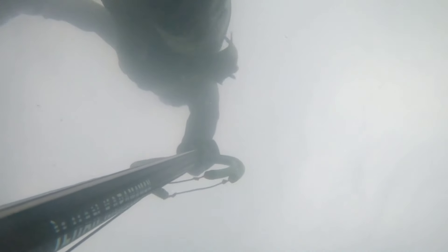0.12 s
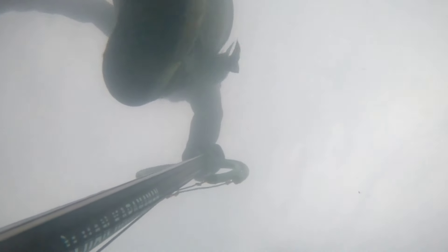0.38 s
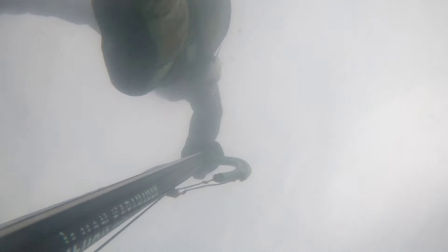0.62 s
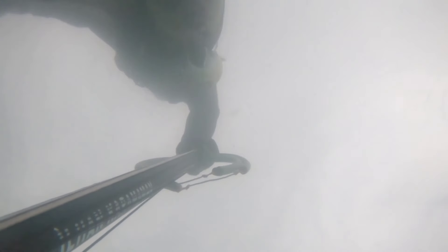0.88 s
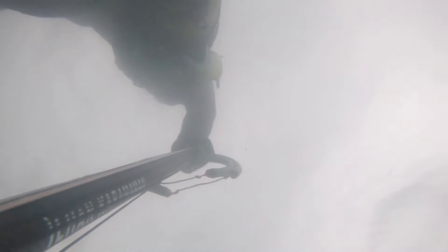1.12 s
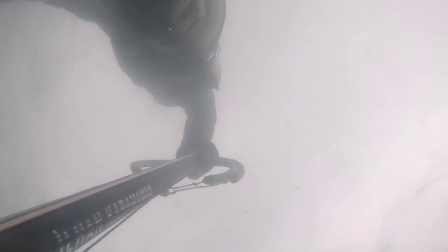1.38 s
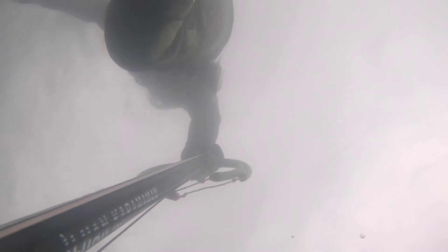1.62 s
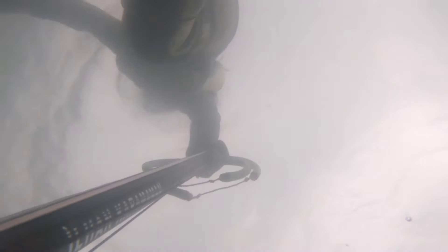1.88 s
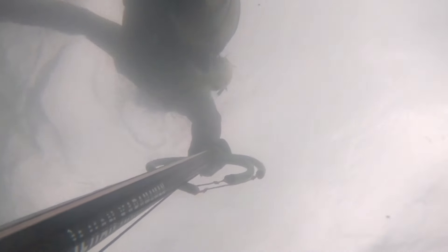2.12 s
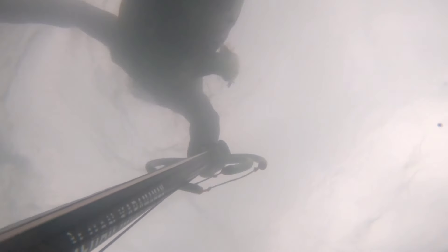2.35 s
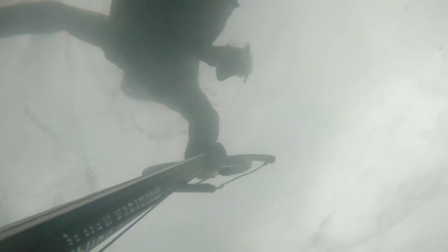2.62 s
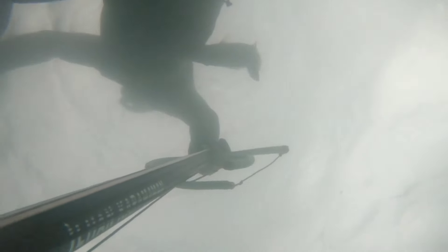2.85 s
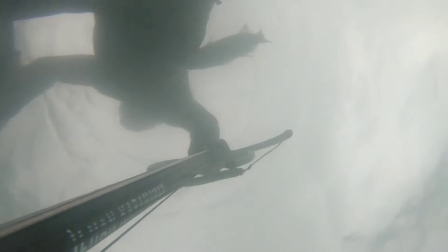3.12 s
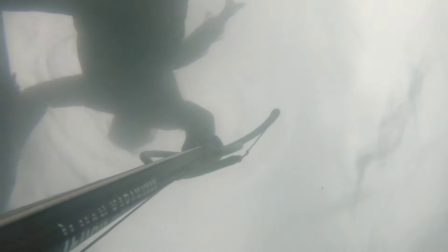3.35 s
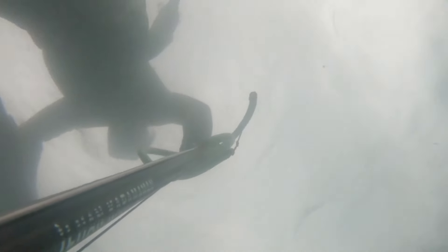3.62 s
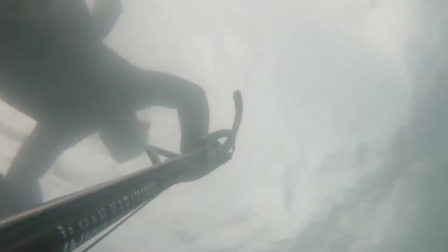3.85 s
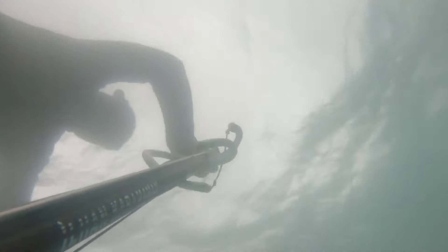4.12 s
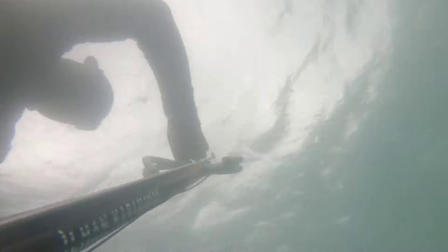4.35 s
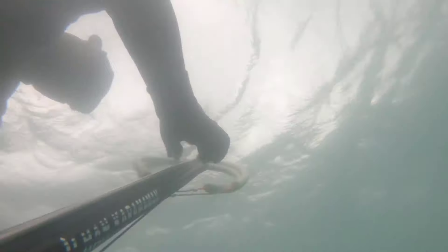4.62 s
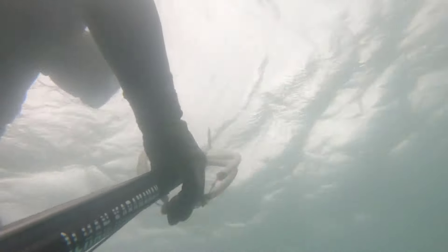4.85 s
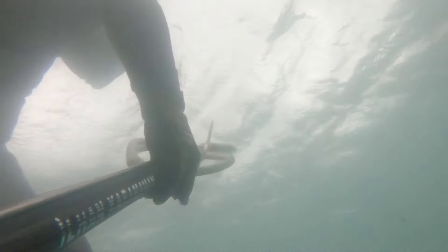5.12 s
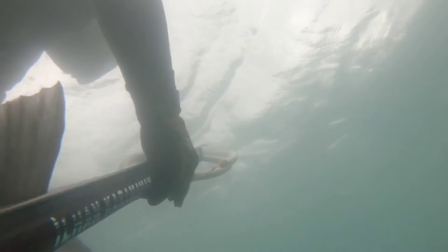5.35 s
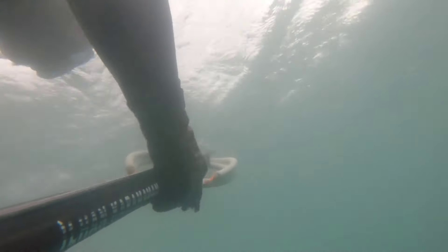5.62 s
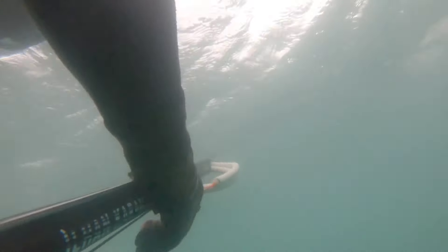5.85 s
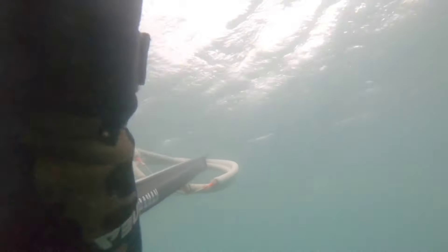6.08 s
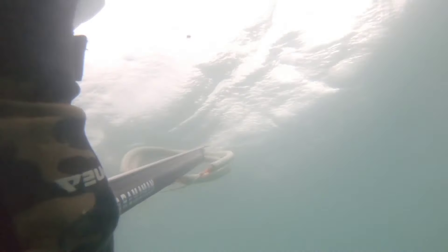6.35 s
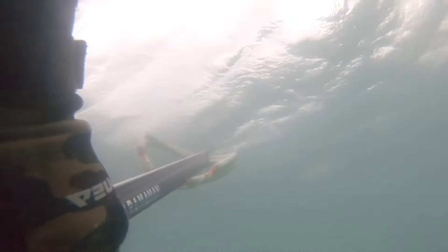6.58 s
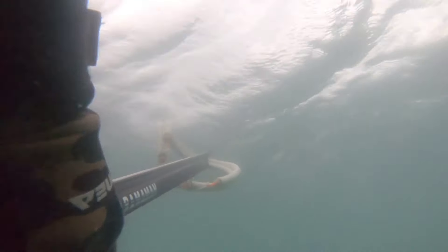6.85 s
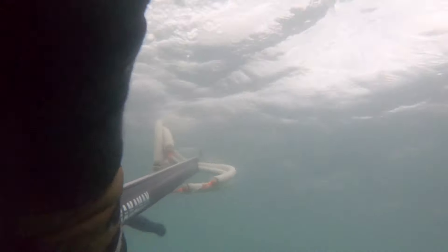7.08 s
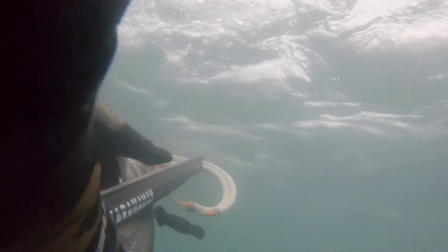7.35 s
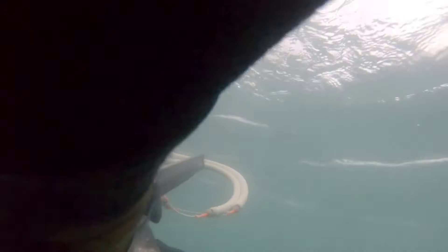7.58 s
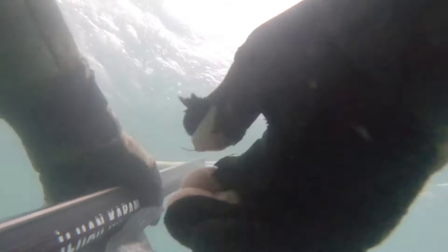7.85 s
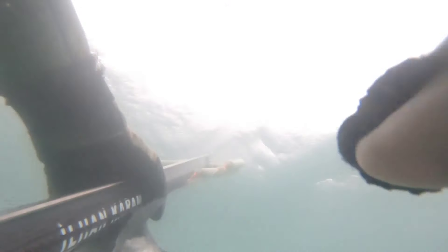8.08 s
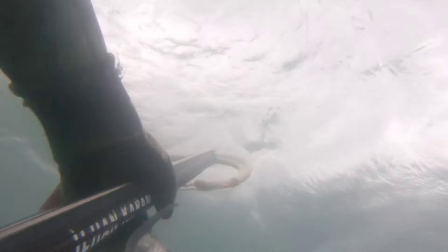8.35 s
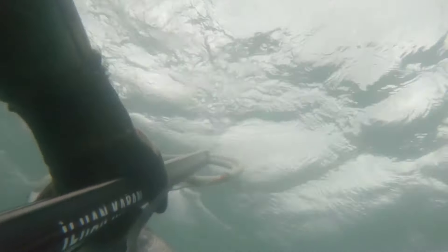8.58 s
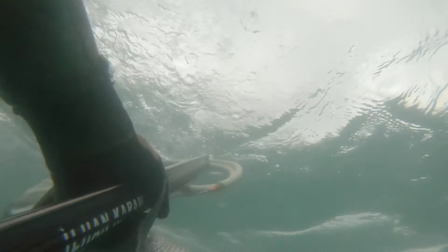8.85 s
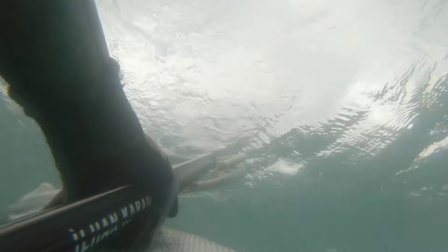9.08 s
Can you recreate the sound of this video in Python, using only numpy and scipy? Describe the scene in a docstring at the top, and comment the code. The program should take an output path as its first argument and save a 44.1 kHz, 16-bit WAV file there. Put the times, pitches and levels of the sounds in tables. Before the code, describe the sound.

Submerged, boxy low rumbling with soft bumps, a growing crackle of bubbles, one hard hollow clack, then dull bumping and rubbing of gear.

```python
"""Under water, a small sealed camera rides on a long pole held by a swimmer.
Shoves rock the pole and shudder its mount; water and gear graze the shell, exciting its damped modes.
Hands and gear knock and rub on it, a glove scrapes past the microphone ports, and bubbles tick and hiss.
The two ports are blended to mono except for a few seconds that open to stereo."""
import sys
import numpy as np
from scipy import signal
from scipy.fft import rfft, irfft
from scipy.io import wavfile
from scipy.ndimage import uniform_filter1d

SR = 44100
rng = np.random.default_rng(int(sys.argv[2]) if len(sys.argv) > 2 else 0)


def int16_out(signal):
    """Quantize to a 16-bit WAV file."""
    q = np.round(np.clip(np.atleast_2d(signal).T, -1, 1) * 32767)
    wavfile.write(sys.argv[1], SR, q.astype(np.int16))


def gain_from_decibels(decibels):
    """Convert decibel values to linear amplitude factors."""
    exponent = np.asarray(decibels, float) / 20
    return 10 ** exponent


N = 406160  # length in samples

# Slow bending modes of the pole and its mount.
# Each row: frequency in Hz, width in Hz, height in dB.
POLE_MODES = [(32.3, 7.5, 0), (64.6, 170, -1), (79, 12, -3.5)]
# Modes of the sealed housing, from dull to bright.
# Each row: frequency in Hz, width in Hz, height in dB.
HOUSING_MODES = [(198, 68, -7), (318, 148, 4), (432.6, 69, 2.5), (570, 32, 5.5), (837, 73, 3.5),
                 (1316, 181, 2), (1614, 130, -9.5), (2035, 23, -10.5), (2790, 110, -16), (3120, 170, -19),
                 (4340, 110, -29), (5150, 1900, -49), (6570, 510, -56.5)]
# Borders between the dull, middle, bright and brightest housing modes
WASH_HZ, BRIGHT_HZ, GRAZE_HZ = 750, 2300, 4000


def evened(x):
    """Scales to rms 1."""
    return x / np.sqrt(np.mean(x ** 2) + 1e-20)


def smoothed(x, s):
    """Runs a moving average of s seconds over the sound twice."""
    size = round(s * SR)
    return uniform_filter1d(uniform_filter1d(x, size), size)


def steadied(x, s):
    """Divides out slow level drift, so that the played curve sets the level."""
    return x / np.sqrt(abs(smoothed(x ** 2, s)) + 1e-20)


def curve(rows):
    """Draws each column of a table as a line over all samples; the first column is the time."""
    s, *columns = np.transpose(rows)
    return [np.interp(np.arange(N) / SR, s, column) for column in columns]


def add(mix, s, sound):
    """Mixes a sound in at time s."""
    part = mix[max(round(s * SR), 0):][:len(sound)]
    part += sound[:len(part)]


def ring(modes, size=8192, spread_db=0.):
    """Impulse response of damped modes that swell in through the soft shell; dB is each resonance's height."""
    t, out = np.arange(size) / SR, np.zeros(size)
    for hz, width, db in modes:
        chance = rng.standard_normal(2)  # scatters height and pitch
        fade = 2 * np.pi * width * t
        turns = hz * (1 + .004 * spread_db * chance[1]) * t
        height = gain_from_decibels(db + spread_db * chance[0])
        out += height * width * fade * np.exp(-fade) * np.sin(2 * np.pi * turns)
    return out


def part_of(lo_hz, hi_hz):
    """The housing modes within a range."""
    return [mode for mode in HOUSING_MODES if lo_hz <= mode[0] < hi_hz]


def grit(per_s, spread_db, lump_s, lump_db):
    """Random small impacts that come in lumps."""
    size = gain_from_decibels(spread_db * np.minimum(rng.exponential(1, N), 5))
    size = size * (rng.random(N) < per_s / SR)
    lumps = evened(smoothed(rng.standard_normal(N), lump_s))
    return size * rng.standard_normal(N) * gain_from_decibels(lump_db * lumps)


def shoves():
    """Level of the rocking and of the shudder: each shove builds up, peaks and dies away."""
    # The swimmer shoves or jerks the pole.
    # Each row: time of the peak in seconds, build-up in seconds (at least 0.02 is used),
    # peak rocking of the pole in dB, peak shudder of the mount in dB.
    shove_rows = [(0.091, 0.048, -21.5, -23), (0.758, 0.35, -28, -32.5), (1.36, 0.087, -23, -26.5),
                  (1.959, 0.039, -30.5, -29), (2.729, 0.066, -53.5, -26), (3.21, 0.027, -25, -34),
                  (3.479, 0.04, -24, -36), (4.201, 0.26, -25.5, -19.5), (4.539, 0.36, -18, -18),
                  (4.944, 0.03, -23.5, -10), (5.123, 0.095, -15, -15.5), (5.921, 0.2, -18.5, -20),
                  (6.321, 0.12, -28, -13.5), (6.427, 0.047, -19.5, -15.5), (6.977, 0.27, -16, -21.5),
                  (7.406, 0.049, -35, -12), (7.629, 0.063, -11.5, -16), (8.348, 0.096, -16, -23.5),
                  (8.769, 0.03, -19.5, -13.5), (8.868, 0.19, -23.5, -24), (9.053, 0.07, -20, -38)]
    build_db = 15  # climb during the build-up
    rock_fall_db_per_s, shudder_fall_db_per_s = 35.5, 77.5
    stop_s, stop_db_per_s = 0.5, 53  # this long after the peak, water drag damps the rocking harder
    calm_rock_db, calm_shudder_db = -39.5, -41  # present throughout

    s, build, rock_db, shudder_db = np.transpose(shove_rows)[:, :, None]
    frames = np.arange(0, N + 64, 64) / SR
    after = np.maximum(frames - s, 0)
    before_db = build_db * np.minimum(frames - s, 0) / np.maximum(build, .02)
    rock_db = rock_db - rock_fall_db_per_s * after
    rock_db = rock_db - stop_db_per_s * np.maximum(after - stop_s, 0)
    shudder_db = shudder_db - shudder_fall_db_per_s * after
    levels = []
    for db, calm_db in (rock_db, calm_rock_db), (shudder_db, calm_shudder_db):
        power = gain_from_decibels(calm_db) ** 2 + (gain_from_decibels(db + before_db) ** 2).sum(0)
        levels.append(np.interp(np.arange(N) / SR, frames, np.sqrt(power)))
    return levels


def sway():
    """Eddies push the pole into its slow bending modes, and the shoves set how strongly it moves."""
    rocking, shuddering = shoves()
    rock, shudder = (
        signal.oaconvolve(grit(per_s=600, spread_db=2.5, lump_s=0.042, lump_db=4.5), ring(modes))[:N]
        for modes in (POLE_MODES[:1], POLE_MODES[1:]))
    rock = signal.sosfilt(signal.butter(2, 50, fs=SR, output="sos"), rock)
    shudder = signal.sosfilt(signal.butter(3, [42, 100], "bandpass", fs=SR, output="sos"), shudder)
    return rocking * steadied(rock, 0.089) + shuddering * steadied(shudder, 0.2)


def knocks():
    """Each blow or rub is a rattling contact that rings the housing from a different spot."""
    # Short blows. Each row: start in seconds, level of the middle modes in dB,
    # dull modes in dB over them, centre of the dull modes in Hz, bright modes in dB over the middle ones.
    blow_rows = [(0.062, -41, 17, 197, -21), (0.149, -40.5, 11, 500, -22), (.454, -49.5, 17, 427, -25),
                 (0.949, -42, 15, 212, -12), (1.341, -49.5, 20.5, 202, -23), (1.873, -31, -7, 524, -35),
                 (1.946, -32.5, -9.5, 507, -24), (2.053, -35, -4, 510, -29), (2.14, -38, -2, 444, -34),
                 (2.596, -30, 2, 482, -29), (2.68, -32.5, 9.5, 367, -18), (3.003, -12, -41.5, 505, -20.5),
                 (3.184, -23, -16, 425, -46), (3.695, -29.5, -5, 600, -19), (3.861, -22, -24.5, 558, -19.5),
                 (4.436, -23.5, -7, 278, -3), (4.478, -19, -3, 375, -20), (4.516, -28.5, -1.5, 197, -12),
                 (5.485, -35.5, 7, 295, -17), (6.121, -37.5, 7.5, 383, -14.5), (6.484, -47, 9.5, 400, -2),
                 (6.511, -30.5, 3.5, 318, -5.5), (6.55, -26.5, 0, 315, -12), (6.566, -30.5, 3.5, 306, -9.5),
                 (6.825, -43, 12, 366, -11), (6.882, -29, 1, 455, -17.5), (6.956, -25.5, 8.5, 438, -12.5),
                 (7.269, -42.5, 13, 169, -14), (7.362, -31, 10.5, 400, -11), (7.396, -17, 1.5, 400, -8.5),
                 (7.381, -18.5, 9, 283, -23), (8.313, -31.5, 13, 327, -16), (8.419, -38, 10, 600, -15),
                 (8.699, -47.5, 16, 530, -14.5), (8.75, -33.5, 7.5, 127.4, -17.5),
                 (8.858, -56, 23, 151, -23)]
    # Drawn-out rubs. Each row: start in seconds, length in seconds, level of the middle modes in dB,
    # dull modes in dB over them, centre of the dull modes in Hz.
    rub_rows = [(4.031, 0.038, -28.5, -3.5, 261), (4.377, 0.094, -31, 5, 400),
                (4.957, 0.029, -26.5, 7.5, 400), (5.018, 0.038, -36, -13, 113.5),
                (5.07, 0.034, -25, 9, 400), (5.278, 0.094, -39.5, 0.5, 440), (5.811, 0.064, -38, 3.5, 246),
                (5.875, 0.085, -42, 8.5, 364), (6.348, 0.082, -30.5, 2, 354), (6.4, 0.028, -24.5, 5, 363),
                (7.046, 0.035, -36.5, 7, 288), (7.084, 0.053, -33, 5, 308), (7.411, 0.053, -39.5, 12, 166),
                (7.556, 0.13, -44, 5.5, 213), (7.646, 0.031, -30, 11, 203), (8.334, 0.04, -31, 16, 571),
                (8.499, 0.08, -37.5, 13.5, 620), (8.593, 0.048, -35.5, 4.5, 650),
                (8.901, 0.078, -47.5, 3, 534), (8.988, 0.083, -51, 18.5, 223), (9.076, 0.029, -44, 15, 577)]
    # Extra height of the brightest modes among the bright ones. Each row: time in seconds, height in dB.
    brightest_rows = [(4.4, -13), (5, -5.5), (8.2, -4.5), (8.3, 14)]
    contact_s, longer_db_per_dull_db = 0.0082, 0.71  # softer, duller blows stay longer in contact
    blow_rise, rub_rise = 0.096, 0.41  # as a share of the contact
    grip_hz = 39.3  # the touching hand damps every mode, widening it
    first_touch = 0.45  # sharp start of a blow's thud against the rattle after it
    rub_bright_db, rub_bright_slope = -28, -0.32  # light rubs are the brighter

    contacts = []
    for s, db, dull_db, dull_hz, bright_db in blow_rows:
        length = contact_s * gain_from_decibels(longer_db_per_dull_db * dull_db)
        contacts.append((s, length, db, dull_db, dull_hz, bright_db, blow_rise))
    for row in rub_rows:
        contacts.append((*row, rub_bright_db + rub_bright_slope * row[2], rub_rise))

    out = np.zeros(N)
    for s, length, db, dull_db, dull_hz, bright_db, rise in contacts:
        t = np.arange(8192) / SR / np.clip(length, .003, .09)  # in contact lengths
        jolts = gain_from_decibels(3.53 * rng.standard_normal(len(t) // 128).repeat(128)[:len(t)])
        rattle = rng.standard_normal(len(t)) * jolts
        extra_db = np.interp(s, *np.transpose(brightest_rows))
        bright = [(hz, width, top + extra_db * (hz > GRAZE_HZ)) for hz, width, top in part_of(BRIGHT_HZ, SR)]
        dull = POLE_MODES[2:] + part_of(0, WASH_HZ) + part_of(WASH_HZ, SR)[:1]
        # dull modes far from the centre get less, in dB per octave
        near = [(hz, width, top - 26.7 * abs(np.log2(hz / dull_hz))) for hz, width, top in dull]
        middle = part_of(WASH_HZ, BRIGHT_HZ)
        for modes, over_db, lasts in (near, dull_db, 1.3), (middle, 0, 1), (bright, bright_db, .75):
            u = t / lasts  # the treble dies first, the dull body lingers
            hold = np.exp(-u ** (2 + (rise == rub_rise)))  # rubs hold longer
            trail = 0.15 * np.exp(-u / 1.94)
            contact = rattle * (hold + trail) * np.minimum(t / rise, 1)
            if rise == blow_rise and modes is near:
                contact[100] += first_touch * np.linalg.norm(contact)
            gripped = [(hz, width + grip_hz, top) for hz, width, top in modes]
            sound = signal.fftconvolve(contact, ring(gripped, size=2048, spread_db=3.5))
            sound = evened(sound) * np.sqrt(length * SR / len(sound))  # longer contacts carry more energy
            add(out, s, gain_from_decibels(db + over_db) * sound)
    return out


def flow():
    """Water and gear graze the shell: gritty drive into its low and high modes."""
    # Each row: time in seconds, dull wash on the housing in dB, rubbing on the shell in dB.
    flow_rows = [(0, -44, -50.5), (1.67, -46, -51.5), (3.15, -53.5, -51.5), (4.31, -34, -38.5),
                 (4.8, -39.5, -51.5), (5.65, -48.5, -54), (6.34, -43, -46), (7.2, -43, -48.5),
                 (7.52, -57, -56), (7.8, -27, -72), (7.9, -44, -57), (8.4, -72, -73), (8.55, -44, -47.5),
                 (9.21, -53, -58.5)]
    # Steady flow makes two modes sing. Each row: time in seconds, level in dB.
    sing_rows = [(1.8, -46.5), (3.2, -62.5)]
    wash_db, rub_db = curve(flow_rows)
    shared = grit(per_s=3000, spread_db=2.5, lump_s=0.023, lump_db=3.5)
    own = grit(per_s=4000, spread_db=1.0, lump_s=0.072, lump_db=2.5)
    wash = signal.oaconvolve(shared + 0.91 * own, ring(part_of(0, WASH_HZ)))[:N]
    rub = signal.oaconvolve(shared, ring(part_of(WASH_HZ, GRAZE_HZ)))[:N]
    flutter = grit(per_s=3000, spread_db=2.5, lump_s=0.025, lump_db=6.5)
    singing_modes = [part_of(0, WASH_HZ)[-1], part_of(BRIGHT_HZ, SR)[0]]
    sing = signal.oaconvolve(flutter, ring(singing_modes))[:N]
    out = gain_from_decibels(curve(sing_rows)[0]) * evened(sing)
    return out + gain_from_decibels(wash_db) * steadied(wash, 0.21) + gain_from_decibels(rub_db) * steadied(rub, 0.42)


def glove():
    """A glove slides past the ports: a fine-grained scrape of coloured noise."""
    # Each row: time in seconds, level in dB.
    slide_rows = [(7.685, -39.5), (7.751, -23), (7.8, -36), (7.838, -28), (7.876, -52)]
    # Colour of the scrape. Each row: frequency in Hz, relative density in dB per Hz.
    colour_rows = [(700, -13.5), (1700, 0), (2500, -13.5), (4500, -27.5), (7000, -27.5), (9800, -42),
                   (15500, -47)]
    hz, (f, db) = np.fft.rfftfreq(N, 1 / SR), np.transpose(colour_rows)
    colour = gain_from_decibels(np.interp(np.log(hz + 1), np.log(f), db))
    grains = grit(per_s=5000, spread_db=0.0, lump_s=0.014, lump_db=0.5)
    noise = irfft(rfft(grains) * colour, N)
    s, level_db = np.transpose(slide_rows)
    return evened(noise) * gain_from_decibels(np.interp(np.arange(N) / SR, s, level_db, left=-200, right=-200))


def ticks():
    """Bubbles let go, more of them on the way up: small ones crackle, large ones ring for some cycles."""
    # Single bubbles. Each row: start in seconds, peak in dB, starting pitch in Hz.
    single_rows = [(1.684, -24, 2750), (3.336, -28, 1235), (3.389, -29, 1337), (3.439, -28, 1330),
                   (3.94, -23, 1850)]
    from_s, for_s, per_s = 1.85, 2.7, 170  # the climb, and bubbles per second on average
    swarms, swarm_s = 90, 0.027  # bubbles leave in swarms, each trailing by this long on average
    base_db, surge_db = -42, 8  # louder at the end of the climb

    out, t = np.zeros(N), np.arange(1200) / SR
    draws = rng.random((round(per_s * for_s), 3))
    draws[:, 0] = rng.choice(rng.random(swarms), len(draws))
    late = swarm_s * rng.exponential(size=len(draws))
    bubbles = list(single_rows)
    for (climb, luck, small), delay in zip(draws, late):
        db = base_db + surge_db * climb ** 4 - 3. * np.log(luck + 0.03) - 12 * small
        bubbles.append((from_s + for_s * climb + delay, db, 1050 * 7 ** small ** 1.4))
    for s, db, hz in bubbles:
        cycles = 0.8 + 13. * min(1200 / hz, 1) ** 1.6
        swell = np.sin(np.pi / 2 * np.minimum(t * hz / min(cycles, 3), 1)) ** 2
        envelope = np.exp(-t * hz / cycles) * swell
        add(out, s, gain_from_decibels(db) * envelope * np.sin(2 * np.pi * hz * t * (1 + 0.5 * t)))  # pitch creeps up
    return out


def fizz():
    """Very small bubbles hiss in the highest modes, and now and then swish past in a cloud."""
    # Soft bright swishes. Each row: start in seconds, length in seconds (at least 0.002 is used), level in dB.
    swish_rows = [(0.27, 0.073, -58.5), (0.792, 0.02, -50), (1.362, 0.019, -54), (1.431, 0.014, -42.5),
                  (1.652, 0.015, -38.5), (2.025, 0.0033, -48), (2.456, 0.01, -40), (2.503, 0.0071, -52.5),
                  (2.572, 0.0099, -47.5), (2.657, .006, -43.5)]
    # Fine hiss of water. Each row: time in seconds, level in dB.
    hiss_rows = [(0, -73.5), (8.3, -82.5), (8.55, -68)]
    grains = grit(per_s=3400, spread_db=1.0, lump_s=0.017, lump_db=2.)
    hiss = signal.oaconvolve(grains, ring(HOUSING_MODES[-2:], size=1024))[:N]
    t, swish = np.arange(4096) / SR, np.zeros(N)
    for s, length, db in swish_rows:
        u = t / max(length, .002)
        add(swish, s, gain_from_decibels(db) * np.minimum(u / 0.47, 1) * np.exp(-u))
    modes = [(hz, width, 11. * (hz < GRAZE_HZ)) for hz, width, _ in part_of(BRIGHT_HZ, SR)]
    bright = ring(modes, size=1024)
    spray = signal.oaconvolve(swish * rng.standard_normal(N), bright / np.linalg.norm(bright))[:N]
    return gain_from_decibels(curve(hiss_rows)[0]) * evened(hiss) + spray


def scene():
    """The two ports hear the same sound; their difference is shifted in phase and a little scattered."""
    # Difference of the ports against their sum.
    # Each row: frequency in Hz, level in dB, phase lead in radians.
    port_rows = [(400, -19.5, 1.7), (750, 8, 1.5), (1240, 5.5, 2.5), (1900, 1, -2.5), (3000, 1.5, -1.5)]
    mid = sway() + flow() + knocks() + ticks() + fizz() + glove()
    hz, (f, db, lead) = np.fft.rfftfreq(N, 1 / SR), np.transpose(port_rows)
    place = np.log(hz + 1), np.log(f)
    scatter = rng.standard_normal(400) * np.exp(-np.arange(400) / 90.)
    scatter = rfft(scatter / np.linalg.norm(scatter), N)
    paths = 1 + 0.31 * np.minimum(hz / 900, 1) * scatter  # less scatter in the bass
    shift = gain_from_decibels(np.interp(*place, db)) * np.exp(1j * np.interp(*place, lead))
    side = irfft(rfft(mid) * paths * shift, N)
    return np.array([mid + side, mid - side])


def low_pass(x):
    """Removes everything above the highest recorded frequency."""
    return signal.sosfilt(signal.butter(12, 15500, fs=SR, output="sos"), x)


def record(dry):
    """The ports blend between mono and stereo; then come preamp hiss and a hard ceiling."""
    # Stereo width. Each row: time in seconds, level of the difference between the ports in dB.
    width_rows = [(.75, -42), (1.1, -14), (2.2, -3), (4.55, -1), (4.85, -15.5), (6.2, -46.5)]
    mid = (dry[0] + dry[1]) / 2
    side = (dry[0] - dry[1]) / 2 * gain_from_decibels(curve(width_rows)[0])
    white = rng.standard_normal((2, N)) * gain_from_decibels(-100)
    hiss = signal.lfilter([1], [1, -.8], white)  # darker than white noise
    finished = np.clip(np.array([mid + side, mid - side]) + hiss, -.96, .96)
    return low_pass(finished)


dry = scene()
out = record(dry)
int16_out(out)
```